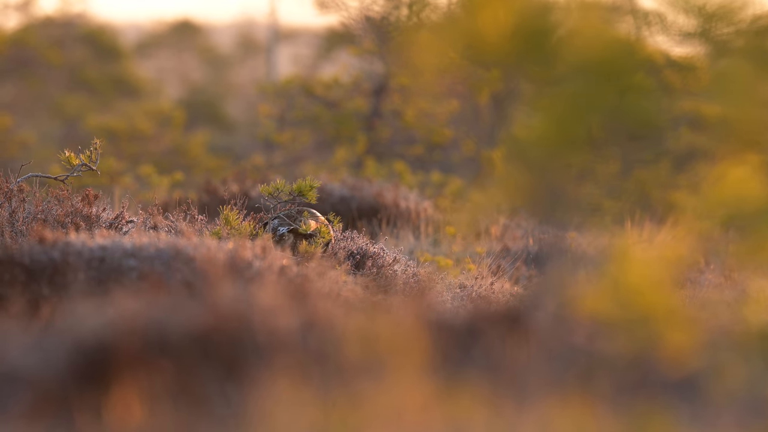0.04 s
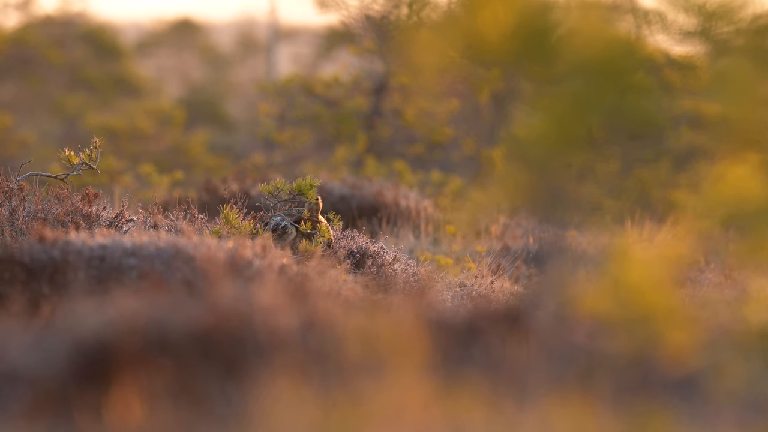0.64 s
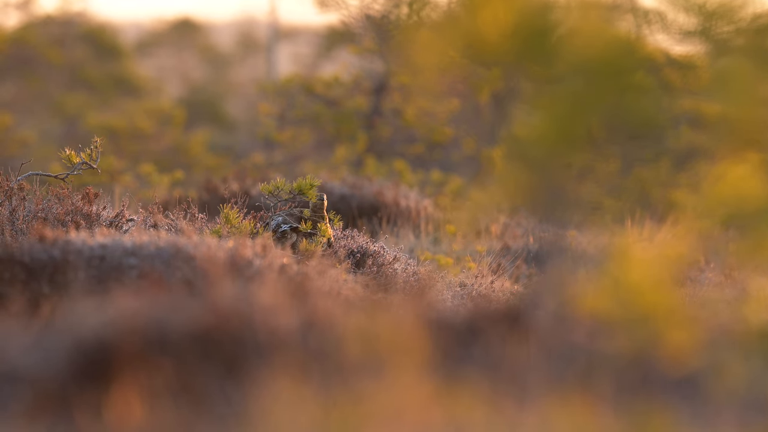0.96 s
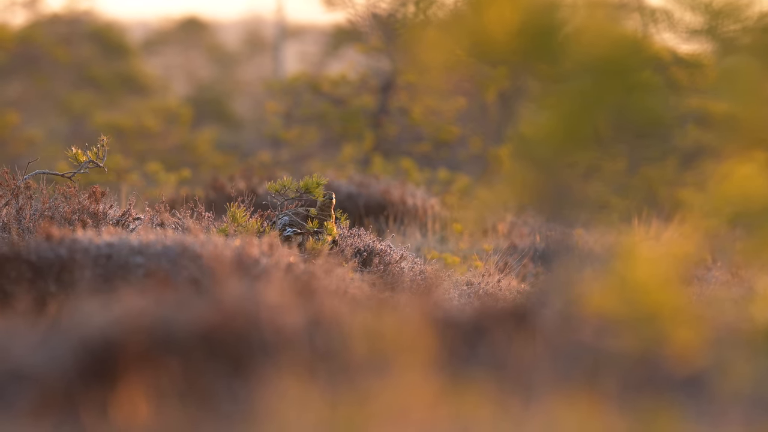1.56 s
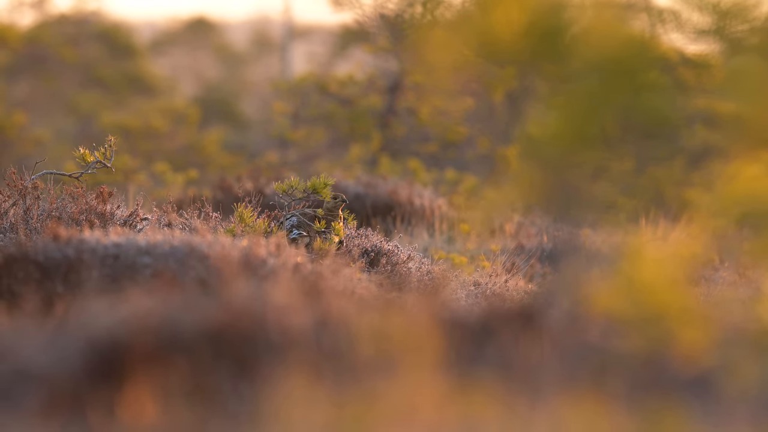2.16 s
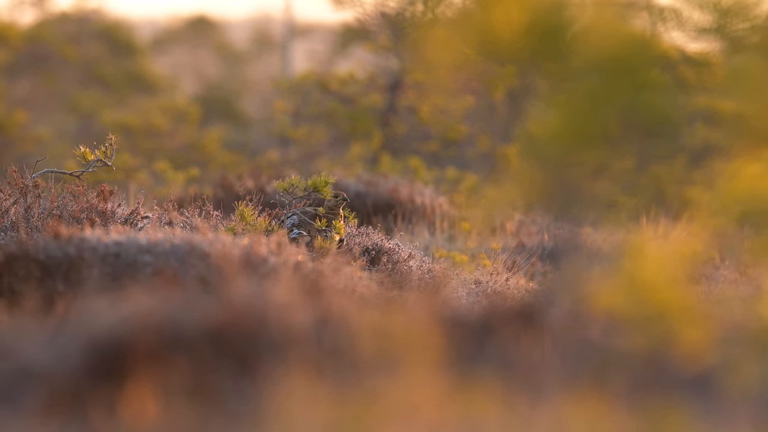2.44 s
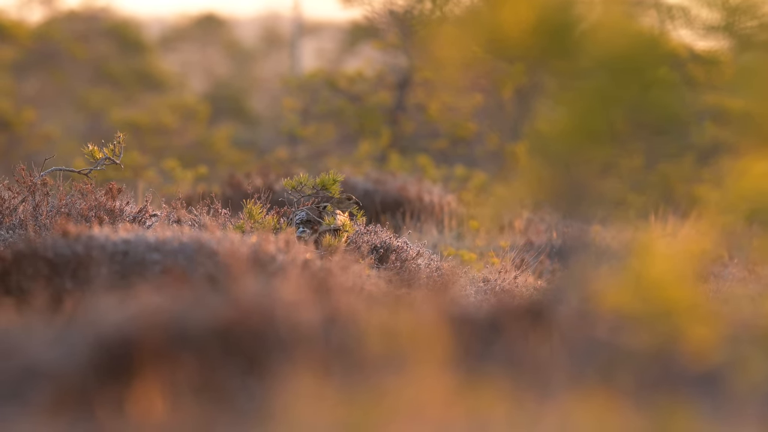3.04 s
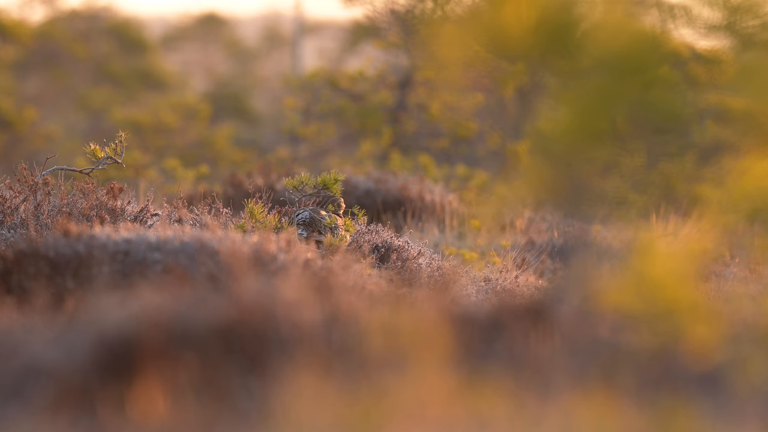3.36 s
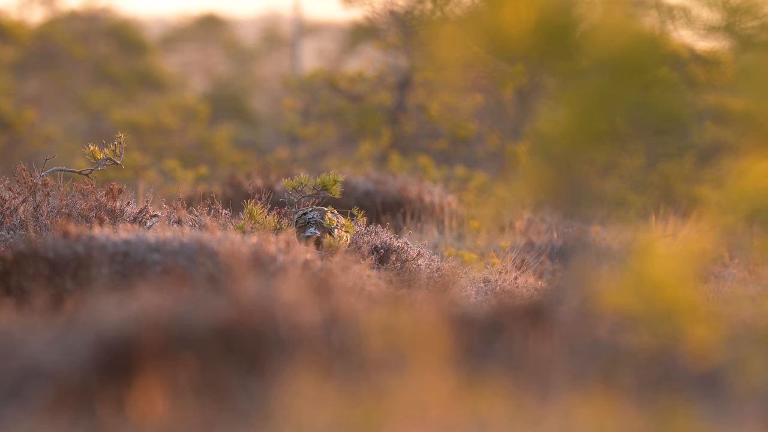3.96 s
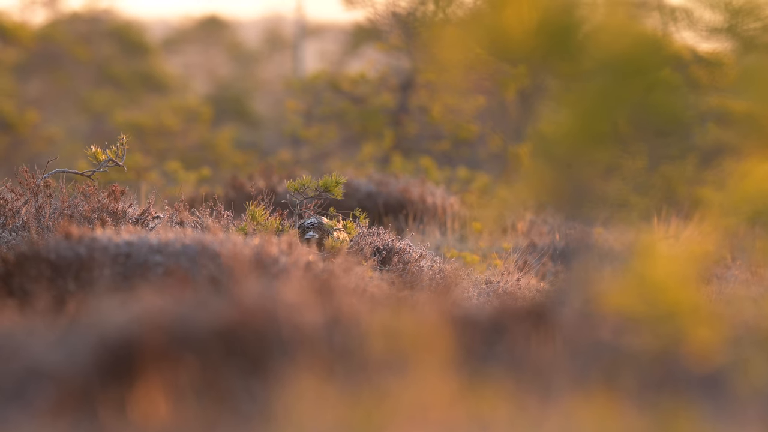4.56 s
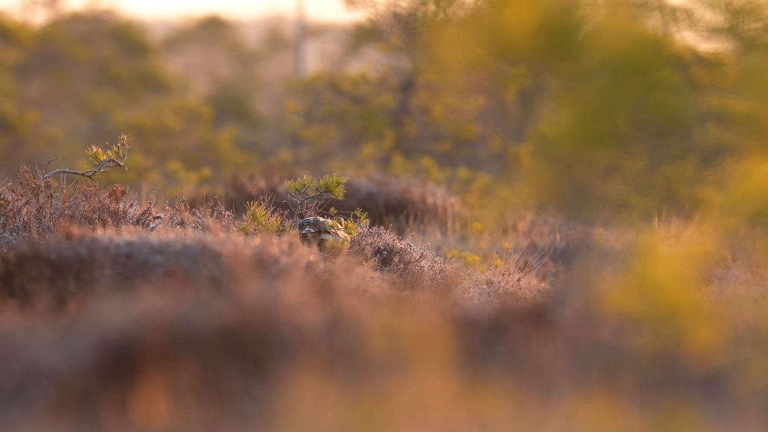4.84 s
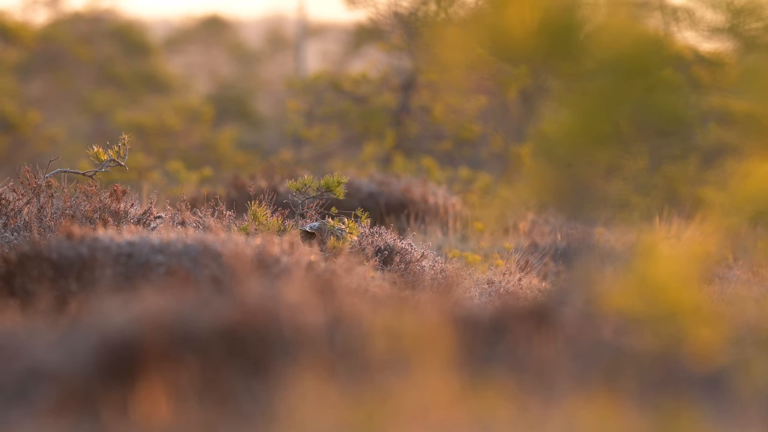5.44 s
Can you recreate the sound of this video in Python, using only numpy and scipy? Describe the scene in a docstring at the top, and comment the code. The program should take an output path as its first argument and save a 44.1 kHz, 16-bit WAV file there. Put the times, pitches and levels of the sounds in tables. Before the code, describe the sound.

Black grouse sing throughout on a calm open bog. The closest bird opens with a brief coo and pop. From about 0.4 to 1.9 seconds it gives low, hollow, arching coos broken by soft pops. Around 2 seconds it moves into an even run of bubbles, about twelve a second, climbing in pitch and strength until 3.2 seconds. After a short break the coos return at 3.5 seconds, and another bubble run starts near 5 seconds and carries on to the end. A second grouse, quieter and more echoing, sings out of step, starting new phrases around 1.5 and 4.7 seconds. A far bird gives very faint nasal notes in the first half second, trailing off by 1.7 seconds. A twig ticks lightly once at about 4.3 seconds. Underneath are a faint blur of distant grouse, a slight echo from pines and a soft, steady rumble of air.

```python
"""Black grouse on a bog at dawn

Two near cocks and four distant ones sing one phrase: arched coos broken by pops, then an even run of
bubbles climbing in pitch and effort. Each note swells as it crosses the resonance of the inflated neck.
Pines scatter a faint echo; a far bird calls nasally, the air rumbles softly and a twig ticks."""
import sys
import numpy as np
from scipy import signal
from scipy.fft import rfft, irfft
from scipy.io import wavfile

SR = 44100
rng = np.random.default_rng(int(sys.argv[2]) if len(sys.argv) > 2 else 0)


def unload_wav(signal):
    """Save mono or channel-first audio to the path in sys.argv[1] as 16-bit WAV at rate SR, clipped to [-1, 1]."""
    wavfile.write(
        sys.argv[1],
        SR,
        np.round(np.clip(np.atleast_2d(signal).T, -1, 1) * 32767).astype(np.int16),
    )


N = 251370

# Resonances of the inflated neck, in series: centre_hz, bandwidth_hz
NECK_MODES = [(535, 45), (464, 52)]
# Transmission of overtones by the throat: frequency_hz, gain_db
THROAT_RESPONSE = [(650, -52), (850, -54.5), (1000, -56), (1130, -56.5), (1230, -70), (1700, -69.5),
                   (2500, -86)]
# Coos of the nominal phrase: start_s, rise_s, fall_s, start_hz, top_hz, end_hz, effort_db
COOS = [(-.067, .01, .021, 455, 575, 440, -24.5), (-.004, .047, .032, 549, 563, 499, -9),
        (.275, .035, .037, 406, 583, 471, -11), (.376, .037, .03, 420, 544, 452, -12),
        (.472, .038, .034, 404, 582, 320, -12), (.532, .079, .05, 548, 577, 424, -11.5),
        (.788, .029, .009, 434, 522, 390, -8), (.843, .047, .017, 372, 655, 361, -9),
        (1.045, .04, .024, 495, 582, 512, -4.2), (1.14, .033, .016, 384, 564, 484, -9),
        (1.2, .026, .049, 511, 622, 401, -8.7), (1.495, .004, .032, 395, 392, 345, -15),
        (2.785, .023, .026, 625, 612, 412, -9)]
# Pops of the nominal phrase: start_s, fall_s, top_hz, end_hz, effort_db
POPS = [(.161, .018, 635, 480, -4.6), (.759, .012, 565, 508, -5), (.965, .006, 615, 410, -8.6),
        (1.473, .02, 575, 400, -13.5)]
# Pops outside the phrase: start_s, fall_s, top_hz, end_hz, effort_db
LONE_POPS = [(.144, .018, 570, 430, -12), (4.459, .018, 570, 450, -21)]
# Course of the bubble run in the nominal phrase: time_s, top_hz, effort_db
BUBBLE_RUN = [(1.55, 398, -15.4), (2.3, 442, -15.8), (2.55, 479, -13.8), (2.632, 544, -10.2),
              (2.715, 594, -8.6)]
# Phrases of the two near cocks: start_s, stretch_ratio, pitch_ratio, gain_db, relative_echo_db
NEAR_PHRASES = [(-2.746, 1.0, 1.003, 0, -30), (.402, 1.0, 1.0, 0, -31), (3.514, 1.002, 1.0, .3, -30),
                (-1.586, .995, 1.002, -13.5, -18), (1.543, 1.012, 1.012, -13, -18),
                (4.726, 1.006, 1.006, -11.6, -17)]
# Left level over right after the path across the ground: frequency_hz, balance_db
PATH_BALANCE = [(345, -2.4), (430, -4.6), (475, -4.4), (517, -2.8), (560, -1.8), (1200, -2.0)]
# Phase by which left leads right on that path: frequency_hz, lead_rad
PATH_PHASE = [(390, 0), (517, .3), (600, .11)]
# Scattering by pines, stronger for overtones than for the low coo: frequency_hz, gain_db
PINE_SCATTER = [(650, 0), (900, 15)]
# Notes of the far, nasal bird: start_s, length_s, pitch_hz, level_db
NASAL_NOTES = [(0, .11, 495, -61), (.09, .08, 495, -63), (.18, .1, 452, -67), (.285, .075, 450, -67.5),
               (.78, .05, 442, -77), (1.07, .04, 440, -75), (1.28, .11, 437, -78), (1.56, .12, 438, -78)]
# Its harmonics: harmonic_number, gain_db
NASAL_HARMONICS = [(2, 0), (3, -3), (4, -24)]
# Spectrum of still air, the blur of the far lek and hiss: frequency_hz, relative_density_db
AIR_SPECTRUM = [(15, -2), (28, 0), (40, 1.5), (65, -7.5), (150, -14), (290, -10.5), (420, -5), (540, -4),
                (680, -15.5), (1200, -32.5), (2000, -36), (4500, -40.5), (15500, -40.3)]
# Likeness of that noise in the two ears: frequency_hz, correlation_ratio
AIR_COHERENCE = [(30, .88), (120, .7), (500, .75), (1200, .5), (3000, .35), (8000, .15), (15000, .18)]
# Its left level over right: frequency_hz, balance_db
AIR_BALANCE = [(30, -2.8), (200, -2.0), (1000, -1.0), (2500, .2), (12000, -.5)]
# Tick of a twig: start_s, relative_peak_db
TWIG_TICKS = [(4.2682, -45)]
# Spectrum of the tick: frequency_hz, gain_db
TWIG_SPECTRUM = [(300, -20), (1000, 0), (2500, 0), (3800, -4), (4600, -22), (8000, -28), (15000, -40)]


def amp(db):
    """Amplitude ratio of a level in decibels."""
    return 10 ** (np.asarray(db) / 20)


def unit_rms(x):
    """Normalisation to unit mean power."""
    return x / np.sqrt(np.mean(x ** 2) + 1e-20)


def curve_at(points, hz):
    """Interpolation along a logarithmic frequency axis."""
    knots_hz, values = np.transpose(points)
    return np.interp(np.log(hz + 1), np.log(knots_hz + 1), values)


def add(mix, start_s, sound):
    """Superposition of a sound on the mix; its onset may precede time zero."""
    at = round(start_s * SR)
    sound = sound[max(-at, 0):]
    part = mix[max(at, 0):][:len(sound)]
    part += sound[:len(part)]


def waver(samples, rate_hz):
    """Random modulation: Gaussian values joined by straight lines."""
    steps = np.arange(samples) * rate_hz / SR
    return np.interp(steps, np.arange(256), rng.standard_normal(256), period=256)


def glide(u, bend, ease):
    """Power-law glide: share of the way from a note's top pitch (u = 0) to its edge (u = 1)."""
    return 1 - (1 - np.clip(u, 0, 1) ** bend) ** ease


def coo(rise_s, fall_s, start_hz, top_hz, end_hz, effort_db, pitch_ratio,
        swell_db=5, throat_db=1.2, puff_db=-50):
    """Source and filter: an arching tone drives the neck; the throat adds weak, rough overtones."""
    attack_s, release_s, throat_limit_db = .0027, .0036, -8
    length_s = rise_s + fall_s
    t = np.arange(0, length_s + .06, 1 / SR)  # time for the neck to ring out
    hz = top_hz + (start_hz - top_hz) * glide(1 - t / rise_s, bend=1.9, ease=1.91)
    hz += (end_hz - top_hz) * glide((t - rise_s) / fall_s, bend=1.25, ease=.79)
    hz = pitch_ratio * hz * (1 + .008 * waver(len(t), rate_hz=200))
    phase = 2 * np.pi * np.cumsum(hz) / SR
    opening = np.clip(t / attack_s, 0, 1) * np.clip((length_s - t) / release_s, 0, 1)
    gate = np.sin(np.pi / 2 * opening) ** 2
    past_middle = np.minimum(t / length_s - .5, .5)
    source = gate * amp(effort_db + swell_db * past_middle) * np.exp(1j * phase)
    # Effort beyond the throat's limit brightens the overtones instead of driving them harder.
    throat_drive = amp(min(effort_db, throat_limit_db))
    tilt_db = -6 + 1.2 * max(effort_db - throat_limit_db, 0)
    overtones = sum(amp(curve_at(THROAT_RESPONSE, k * hz) + throat_db + tilt_db * (k - 2))
                    * np.cos(k * phase) for k in range(2, 5))
    late_swell = amp(swell_db * np.clip(past_middle, 0, .3))
    roughness = 1 + .35 * waver(len(t), rate_hz=200)
    throat = overtones * gate * late_swell * roughness + airway_puff(t, length_s, puff_db)
    return neck(source) + throat_drive * throat


def neck(source, leak_db=-33):
    """Forced resonance: the inflated neck responds most as the pitch crosses its modes."""
    ring = source
    for centre_hz, bandwidth_hz in NECK_MODES:
        radius = np.exp(-np.pi * bandwidth_hz / SR)
        pole = radius * np.exp(2j * np.pi * centre_hz / SR)
        ring = signal.lfilter([1 - radius], [1, -pole], ring)
    return (ring - amp(leak_db) * source).real


def airway_puff(t, shut_s, level_db, width_s=.007, band_hz=(580, 920)):
    """Band-limited noise in a Gaussian envelope: the soft puff of the airway shutting."""
    band = signal.butter(4, band_hz, "bandpass", fs=SR, output="sos")
    puff = signal.sosfilt(band, rng.standard_normal(len(t)))
    return amp(level_db) * unit_rms(puff) * np.exp(-((t - shut_s) / width_s) ** 2)


def pop(fall_s, top_hz, end_hz, effort_db, pitch_ratio, hold_s=.002):
    """Transient excitation: a clipped coo plunges in pitch and leaves the neck ringing."""
    return coo(hold_s, fall_s, top_hz, top_hz, end_hz, effort_db, pitch_ratio,
               swell_db=4.5, throat_db=1, puff_db=-47)


def bubble(start_s, pitch_ratio, hold_s=.013, fall_s=.053, sag_hz=160, lowest_hz=345):
    """Downward frequency sweep: a note holds the pitch that the run has reached, then sags."""
    times, tops, efforts = np.transpose(BUBBLE_RUN)
    top_hz, effort_db = np.interp(start_s, times, tops), np.interp(start_s, times, efforts)
    end_hz = max(top_hz - sag_hz, lowest_hz)
    return coo(hold_s, fall_s, top_hz, top_hz, end_hz, effort_db, pitch_ratio,
               swell_db=2, throat_db=.5, puff_db=-49)


def phrase(start_s, stretch_ratio, pitch_ratio, run_start_s=1.549, beat_s=.0833, spread_db=.6):
    """Random variation of a pattern: coos, pops and 15 bubbles, each a little off in pitch and level."""
    def detuned():
        return pitch_ratio * (1 + .005 * rng.standard_normal())
    notes = [(s, coo(*shape, detuned())) for s, *shape in COOS]
    notes += [(s, pop(*shape, detuned())) for s, *shape in POPS]
    notes += [(s, bubble(s, detuned())) for s in run_start_s + beat_s * np.arange(15)]
    song = np.zeros(N)
    for s, note in notes:
        add(song, start_s + s * stretch_ratio, amp(spread_db * rng.standard_normal()) * note)
    return song


def near_cocks(lone_echo_db=-24):
    """Direct and scattered sound: two cocks sing out of step, the farther with a larger share of echo."""
    direct = np.zeros(N)
    for start_s, *shape in LONE_POPS:
        add(direct, start_s, pop(*shape, pitch_ratio=1))
    to_trees = amp(lone_echo_db) * direct
    for start_s, stretch_ratio, pitch_ratio, gain_db, echo_db in NEAR_PHRASES:
        song = amp(gain_db) * phrase(start_s, stretch_ratio, pitch_ratio)
        direct += song
        to_trees += amp(echo_db) * song
    scatter = amp(curve_at(PINE_SCATTER, np.fft.rfftfreq(N, 1 / SR)))
    return ground_path(direct) + pine_echo(irfft(rfft(to_trees) * scatter, N))


def ground_path(x):
    """Propagation over the ground gives each ear its own spectrum and phase."""
    hz = np.fft.rfftfreq(N, 1 / SR)
    left = amp(curve_at(PATH_BALANCE, hz) / 2) * np.exp(.5j * curve_at(PATH_PHASE, hz))
    return irfft(rfft(x) * np.array([left, 1 / left]), N)


def pine_echo(x, t60_s=.75, build_s=.035):
    """Scattering: sparse reflections from the pines build up, then decay exponentially in each ear."""
    t = np.arange(SR) / SR
    reflections = rng.standard_normal((2, SR)) * (rng.random((2, SR)) < .03)
    tail = reflections * amp(-60 * t / t60_s) * (1 - np.exp(-(t / build_s) ** 2))
    return signal.fftconvolve(x[None], tail / np.linalg.norm(tail[0]), axes=1)[:, :N]


def far_cocks(count=4, level_db=-52.7, direct_db=-2, balance_db=-2.2, period_s=3.13):
    """Reverberant blur: echoes outweigh the direct song of far cocks, each at his own time and pitch."""
    song = np.zeros(N)
    for cock, (lag, detune) in enumerate(rng.random((count, 2))):
        pitch_ratio = .98 * (1 + .08 * (detune - .5))
        for turn in range(-1, 2):
            song += phrase((turn + (cock + lag) / count) * period_s, 1, pitch_ratio)
    blurred = unit_rms(amp(direct_db) * song + pine_echo(song))
    return amp(level_db) * blurred * amp([[balance_db / 2], [-balance_db / 2]])


def nasal_bird(arch=.025, sag=.04, jitter=.05, echo_db=-10):
    """Missing fundamental: hoarse, drooping notes are carried by their second and third harmonics."""
    calls = np.zeros(N)
    for start_s, length_s, pitch_hz, level_db in NASAL_NOTES:
        u = np.linspace(0, 1, round(length_s * SR))
        contour = 1 + arch * np.sin(np.pi * u) - sag * (u - .5)
        hz = pitch_hz * (contour + jitter * waver(len(u), rate_hz=300))
        phase = 2 * np.pi * np.cumsum(hz) / SR
        note = sum(amp(db) * np.sin(k * phase) for k, db in NASAL_HARMONICS)
        add(calls, start_s, amp(level_db) * note * signal.windows.tukey(len(u), .5))
    return calls + amp(echo_db) * pine_echo(calls)


def air(level_db=-55.2):
    """Partial coherence: steady background noise is most alike at the two ears in the bass."""
    hz = np.fft.rfftfreq(N, 1 / SR)
    noise = rng.standard_normal((4, len(hz)))
    left, independent = noise[::2] + 1j * noise[1::2]
    coherence = curve_at(AIR_COHERENCE, hz)
    right = coherence * left + np.sqrt(1 - coherence ** 2) * independent
    gain_db = curve_at(AIR_SPECTRUM, hz) + np.array([[.5], [-.5]]) * curve_at(AIR_BALANCE, hz)
    return amp(level_db) * unit_rms(irfft(np.array([left, right]) * amp(gain_db), N))


def twig(decay_s=.0006, splinter=.07, gain_db=4, echo_db=-22):
    """Impulsive excitation: a twig in the heather ticks, with a brief tail of splintering noise."""
    ticks, t = np.zeros(N), np.arange(1024) / SR
    spectrum = amp(curve_at(TWIG_SPECTRUM, np.fft.rfftfreq(len(t), 1 / SR)))
    response = np.fft.fftshift(irfft(spectrum))
    for start_s, peak_db in TWIG_TICKS:
        snap = (t == 0) + splinter * rng.standard_normal(len(t)) * np.exp(-t / decay_s)
        tick = signal.fftconvolve(snap, response)
        add(ticks, start_s - len(t) / 2 / SR, amp(peak_db + gain_db) * tick / abs(tick).max())
    return ticks + amp(echo_db) * pine_echo(ticks)


def scene():
    """Linear superposition of the lek and its surroundings."""
    return near_cocks() + far_cocks() + nasal_bird() + twig() + air()


def record(dry, cutoff_hz=15750):
    """Band limiting: a linear-phase low-pass filter removes the highest treble."""
    lowpass = signal.firwin(511, cutoff_hz, window=("kaiser", 9), fs=SR)
    return signal.oaconvolve(dry, lowpass[None], "same")


dry = scene()
out = record(dry)
unload_wav(out)
```